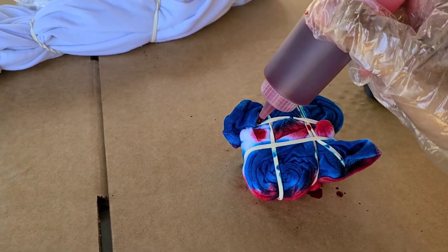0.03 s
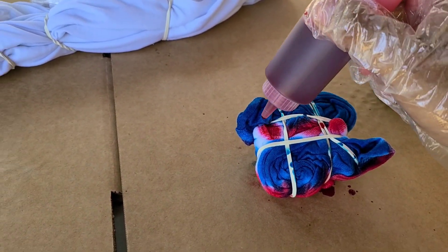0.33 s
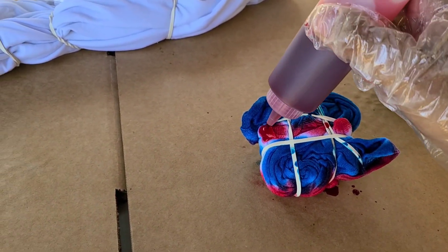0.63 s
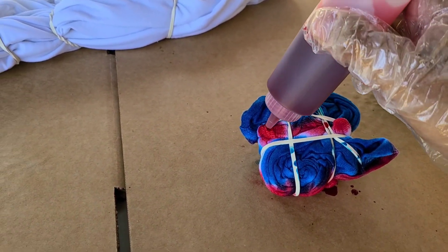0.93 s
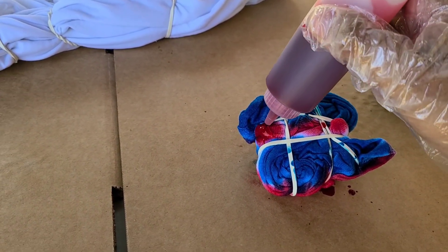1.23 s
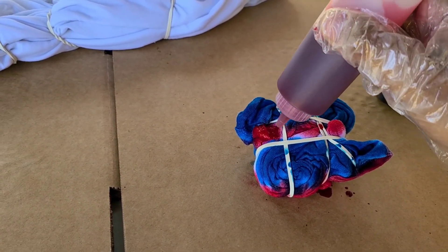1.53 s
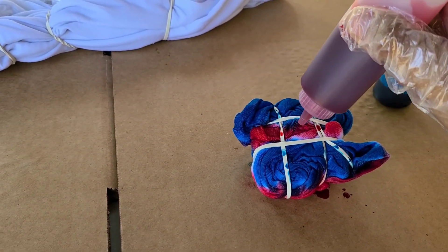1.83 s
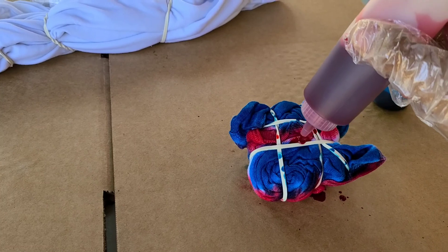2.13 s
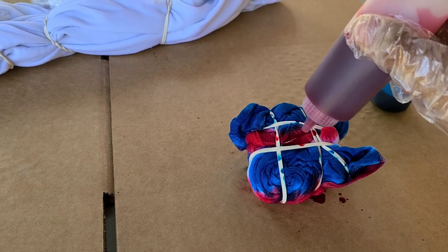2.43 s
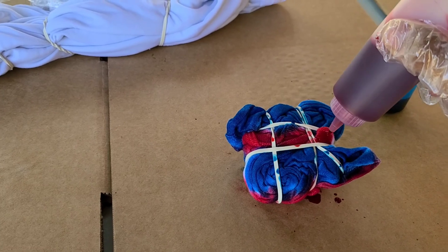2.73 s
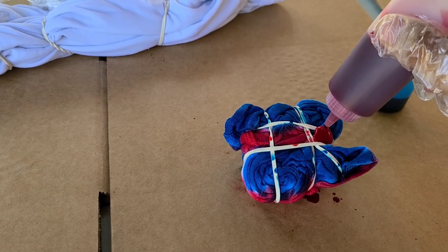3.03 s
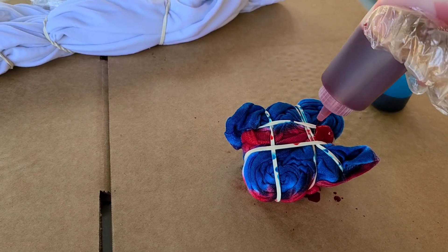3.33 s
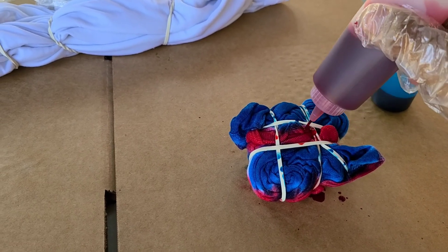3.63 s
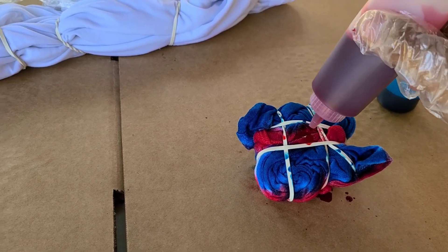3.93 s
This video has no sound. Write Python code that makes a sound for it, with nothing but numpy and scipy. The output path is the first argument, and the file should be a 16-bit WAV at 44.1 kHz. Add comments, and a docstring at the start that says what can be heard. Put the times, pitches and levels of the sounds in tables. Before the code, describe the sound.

Dye squeezed from a bottle onto cloth makes soft crunching rustles close by, with a few plastic glove ticks. Outdoors, a distant engine swells into a deep drone, and a thin falling chirp sounds as the crunches stop.

```python
"""Dye squeezed from a bottle onto cloth, outdoors, near the microphones and a little to the right:
soft crunching rustles, about three a second, like quick steps in dry grass. Each is a dull thud under
a crackle of tiny snaps, some with a hollow knock or a sharp crack, and brushing fills the gaps.
A plastic glove ticks a few times. A thin chirp falls in pitch and a faint whistle lingers.
Far off, an engine swells into a deep, steady drone over the wide outdoor background."""
import sys
import numpy as np
from scipy import signal
from scipy.fft import rfft, irfft
from scipy.io import wavfile
from scipy.ndimage import uniform_filter1d

SR = 44100
rng = np.random.default_rng(int(sys.argv[2]) if len(sys.argv) > 2 else 0)


def master_out(mix):
    """Clip the mix to full scale and print it as 16-bit PCM to the path in sys.argv[1]."""
    frames = np.transpose(np.atleast_2d(mix))
    ceiling = np.clip(frames, -1, 1)
    pcm = np.round(ceiling * 32767).astype(np.int16)
    wavfile.write(sys.argv[1], SR, pcm)


N = 176400
TIME = np.arange(N) / SR


def from_db(db):
    """Decibels to gain."""
    return 10 ** (np.asarray(db) / 20)


def unit_power(x):
    """Scale to a mean square of one."""
    return x / np.sqrt(np.mean(x ** 2) + 1e-20)


def in_time(rows):
    """Each column of a table over time, read at every sample."""
    times, *columns = np.transpose(rows)
    return [np.interp(TIME, times, column) for column in columns]


def per_bin(points):
    """A table over log frequency, read at every spectral bin."""
    hz, value = np.transpose(points)
    bin_hz = np.arange(N // 2 + 1) * SR / N
    return np.interp(np.log(bin_hz + 1), np.log(hz), value)


def colour(x, spectrum):
    """Filter x by a spectrum and scale it to unit power."""
    return unit_power(irfft(rfft(x) * from_db(per_bin(spectrum)), N))


def noise():
    """Two unrelated white noises."""
    return rng.standard_normal((2, N))


def drift(rate_hz):
    """Smooth random wandering with a spread of one."""
    pole = np.exp(-2 * np.pi * rate_hz / SR)
    wander = signal.lfilter([1], [1, -2 * pole, pole * pole], rng.standard_normal(N + SR))
    return unit_power(wander[SR:])


def swell(peak, rise, decay):
    """A rounded rise to a peak, then an exponential decay; all in seconds."""
    age = TIME - peak
    return np.exp(-(np.minimum(age, 0) / rise) ** 2 / 2 - np.maximum(age, 0) / decay)


def envelope(rows):
    """Power sum of swells, each given as peak time, level in dB, rise and decay."""
    return np.sqrt(sum((from_db(db) * swell(s, rise, decay)) ** 2 for s, db, rise, decay in rows))


def pan(left_db):
    """Constant-power gains for the microphone pair; negative leans right."""
    return unit_power(from_db([[left_db / 2], [-left_db / 2]]))


def stereo(pair, likeness):
    """Mix two unrelated signals into left and right with a correlation of -1 to 1."""
    mid, side = rfft(pair)
    return irfft(np.sqrt(1 + likeness) * mid + np.sqrt(1 - likeness) * side * [[1], [-1]], N)


# Near sounds across the pair. Each row: frequency in Hz, left-right correlation.
NEAR_CORRELATION = [(250, 1), (2300, 0.53), (5000, 0), (12000, 0)]

def from_right(pair, lag_s=.00044):
    """A source on the right reaches the left microphone later; its treble is diffuse."""
    left, right = stereo(pair, per_bin(NEAR_CORRELATION))
    return np.array([np.interp(TIME - lag_s, TIME, left), right])


# Open air all around the microphones. Each row: frequency in Hz, relative level in dB.
AIR_SPECTRUM = [(150, 0), (270, -6.5), (390, -5), (475, -4), (590, -6), (750, -4.5), (1300, -17),
                (1900, -18.5), (2400, -38), (7200, -35.5), (8700, -54), (12000, -49)]
# Its slight rise. Each row: time in seconds, level in dB.
AIR_LEVEL = [(.4, -40), (1.2, -37), (4, -37)]
# Its width. Each row: frequency in Hz, left-right correlation.
AIR_CORRELATION = [(220, 0.9), (430, 0.75), (750, -0.62), (1900, 0.2)]

def air(low_cut_hz=124):
    """The outdoor background, a wide, dull wash of noise."""
    wash = colour(stereo(noise(), per_bin(AIR_CORRELATION)), AIR_SPECTRUM)
    wash = signal.sosfilt(signal.butter(2, low_cut_hz, "high", fs=SR, output="sos"), wash)
    return from_db(in_time(AIR_LEVEL)[0]) * unit_power(wash) * pan(-1.05)


# An engine far off, centred. Each row: time in seconds, firing rate in Hz.
FIRING_RATE = [(1.85, 53), (2.05, 51), (2.22, 45)]
# Its drone swelling. Each row: time in seconds, level in dB.
DRONE_LEVEL = [(1.28, -54), (1.5, -30), (1.66, -27.5), (1.76, -41), (1.95, -23.5), (2.07, -24.5),
               (2.25, -18.5), (2.6, -18), (2.76, -23.5), (2.93, -18.5), (3.42, -14.5), (4, -18)]
# Its exhaust, all bass at this distance. Each row: frequency in Hz, relative level in dB.
EXHAUST_SPECTRUM = [(20, -6.5), (38, -9.5), (58, 5), (72, 2.5), (108, 2), (145, -9), (400, -68)]
# The rumble growing. Each row: time in seconds, level in dB.
EXHAUST_LEVEL = [(0, -37), (1.75, -32.5), (2.1, -29), (4, -29)]

def engine(waver_db=1.3):
    """The wavering firing tone of a distant engine and its low exhaust rumble."""
    phase = 2 * np.pi * np.cumsum(in_time(FIRING_RATE)[0]) / SR
    gain = from_db(in_time(DRONE_LEVEL)[0] + waver_db * drift(9))
    drone = gain * np.sqrt(2) * np.sin(phase + np.array([[.12], [-.12]]))
    rumble = colour(stereo(noise(), likeness=0.98), EXHAUST_SPECTRUM)
    return drone + from_db(in_time(EXHAUST_LEVEL)[0]) * rumble


def glide(rows, width_hz, purity):
    """A gliding tone, partly pure and partly narrow noise."""
    hz, db = in_time(rows)
    phase = 2 * np.pi * np.cumsum(hz) / SR
    gate = uniform_filter1d(1. * (TIME > rows[0][0]) * (TIME < rows[-1][0]), size=400)
    sine, cosine = np.sin(phase), np.cos(phase)
    airy = np.array([drift(width_hz) * sine + drift(width_hz) * cosine for _ in range(2)])
    return gate * from_db(db) * (np.sqrt(2 * purity) * sine + np.sqrt(1 - purity) * airy)


# A chirp just left of centre. Each row: time in seconds, pitch in Hz, level in dB.
CHIRP_PATH = [(2.66, 4140, -47), (2.682, 3930, -41.5), (2.708, 3280, -34.5), (2.73, 2950, -40),
              (2.762, 2750, -48), (2.797, 3000, -46.5), (2.825, 2830, -54)]

def chirp(echo_db=-7.5, echo_span_s=0.07, echo_count=12):
    """A thin falling chirp, with scattered echoes at each microphone."""
    call = glide(CHIRP_PATH, width_hz=160, purity=0.22)
    lags = (rng.uniform(.1, 1, (2, echo_count)) * echo_span_s * SR).astype(int)
    echoes = np.array([sum(np.roll(side, lag) for lag in row) for side, row in zip(call, lags)])
    return (call + from_db(echo_db) * echoes / np.sqrt(echo_count)) * pan(2)


# A faint, diffuse whistle. Each row: time in seconds, pitch in Hz, level in dB.
WHISTLE_PATH = [(2.72, 3970, -51), (2.87, 3780, -52.5), (2.96, 4320, -62.5), (3.17, 4810, -57.5),
                (3.42, 4650, -66)]
# A lower resonance with it. Each row: time in seconds, pitch in Hz, level in dB.
UNDERTONE_PATH = [(2.95, 1840, -65), (3.25, 1900, -55), (3.55, 1780, -63)]

def whistle(flutter_db=2.6):
    """Two airy bands of noise flutter together and linger after the chirp."""
    bands = sum(glide(path, width_hz=180, purity=0) for path in (WHISTLE_PATH, UNDERTONE_PATH))
    return from_db(flutter_db * drift(15)) * bands


# The glove, well to the right. Each row: peak time in seconds, level in dB.
GLOVE_TICKS = [(0.14, -34), (0.358, -45), (.638, -40), (0.677, -49), (2.301, -46), (3.148, -38.5),
               (3.22, -45), (3.556, -36), (3.571, -39.5)]
# Its bright plastic sound. Each row: frequency in Hz, relative level in dB.
GLOVE_SPECTRUM = [(2500, -14), (6000, 8), (9000, -3), (14000, 5)]

def glove(tick_decay_s=0.00093, tail_decay_s=0.016, tail_db=-13.5):
    """Thin plastic snaps in short bright ticks, each with a soft tail."""
    tick = envelope([(s, db, .0003, tick_decay_s) for s, db in GLOVE_TICKS])
    tail = envelope([(s, db + tail_db, .002, tail_decay_s) for s, db in GLOVE_TICKS])
    return np.hypot(tick, tail) * colour(noise(), GLOVE_SPECTRUM) * pan(-8)


def crackle(grains_per_s=2600, spread_db=3.8, hiss_share=.3):
    """Dense tiny snaps of uneven size over a smooth hiss."""
    sizes = from_db(spread_db * np.minimum(rng.exponential(1, N), 4))
    grains = unit_power(noise() * sizes * (rng.random(N) < grains_per_s / SR))
    return np.sqrt(1 - hiss_share) * grains + np.sqrt(hiss_share) * noise()


def patchy(x, depth_db=3.6, patch_hz=350, patch_s=.025):
    """Brief chance resonances, as when bending stalks each favour their own pitches."""
    hz, times, cells = signal.stft(x, SR, nperseg=256)
    patches = rng.standard_normal(cells.shape[1:])
    patches = uniform_filter1d(patches, int(patch_hz / hz[1]), axis=0)
    patches = uniform_filter1d(patches, int(patch_s / times[1]), axis=1)
    return signal.istft(cells * from_db(depth_db * unit_power(patches)), SR)[1][:, :N]


# Faint rustling near the microphones. Each row: time in seconds, level in dB.
RUSTLE_LEVEL = [(.27, -53), (.56, -56), (.8, -47), (2.15, -45), (2.28, -53.5), (2.9, -49.5), (3.25, -53),
                (3.6, -60.5)]
# Its colour. Each row: frequency in Hz, relative level in dB.
RUSTLE_SPECTRUM = [(600, -19), (1150, 3), (2400, 0.5), (3300, -1), (7200, -10.5), (8600, -20.5)]
CRUNCH_PAN_DB, THUD_PAN_DB = -1.5, -0.5

def rustle():
    """A continuous bed of crackle, softened with extra hiss."""
    grains = patchy(from_right(crackle() + .5 * noise()))
    return from_db(in_time(RUSTLE_LEVEL)[0]) * colour(grains, RUSTLE_SPECTRUM) * pan(CRUNCH_PAN_DB)


# Brushing close by on the right, between the crunches.
# Each row: peak time in seconds, body level in dB, decay in seconds, sizzle level in dB.
SWISH_STROKES = [(.086, -52.5, 0.046, -53.5), (0.146, -44.5, 0.017, -53), (.437, -47, 0.048, -62),
                 (.484, -43.5, 0.031, -56), (0.637, -47, 0.022, -44), (.73, -50, 0.071, -51.5),
                 (0.935, -45, 0.033, -51.5), (1.075, -44.5, 0.029, -50), (1.135, -43, 0.08, -58),
                 (1.255, -48, 0.027, -58), (1.376, -45.5, 0.016, -47), (1.43, -46.5, 0.048, -51.5),
                 (1.70, -46.5, 0.03, -52), (1.762, -41.5, 0.028, -47), (1.915, -57, 0.028, -51),
                 (2.032, -43.5, 0.019, -46), (2.099, -41, 0.032, -53), (2.234, -49.5, 0.02, -47),
                 (2.337, -42.5, 0.022, -46), (2.39, -42, 0.035, -45), (2.526, -46.5, 0.02, -53.5),
                 (2.645, -45.5, 0.071, -55)]
# The body of a stroke. Each row: frequency in Hz, relative level in dB.
SWISH_SPECTRUM = [(900, -14), (2200, 3), (4300, -1), (7300, -2.5), (8600, -21), (16000, -30)]
# The sizzle on top. Each row: frequency in Hz, relative level in dB.
SIZZLE_SPECTRUM = [(5000, -8.5), (9000, -15.5), (13000, -11.5)]

def swishes(rise_share=0.64):
    """Grainy strokes with a finer sizzle, like grass blades brushing past."""
    grains = patchy(from_right(crackle()))
    body = envelope([(s, db, rise_share * decay, decay) for s, db, decay, _ in SWISH_STROKES])
    sizzle = envelope([(s, db, rise_share * decay, decay) for s, _, decay, db in SWISH_STROKES])
    return (body * colour(grains, SWISH_SPECTRUM) * pan(-5)
            + sizzle * colour(grains, SIZZLE_SPECTRUM) * pan(-3))


def rings(rows, rise_s, decay_s, waver_hz):
    """Dying tones of unsteady pitch, heard from the right."""
    waver = np.array([drift(waver_hz), drift(waver_hz) + np.pi / 2])
    tones = sum(from_db(db) * swell(s, rise_s, decay_s) * np.sin(2 * np.pi * hz * (TIME - s) + waver)
                for s, hz, db in rows)
    return from_right(tones)


# Sharp cracks in the near rustling. Each row: peak time in seconds, pitch in Hz, level in dB.
SHARP_CRACKS = [(0.482, 1840, -34), (0.969, 1980, -31.5), (1.068, 1610, -30), (1.379, 1690, -28.5),
                (1.615, 2320, -39), (1.901, 2220, -35.5), (2.026, 1864, -27.5), (2.142, 3860, -36),
                (2.326, 2120, -28.5)]

def cracks():
    """Each short burst of cracking rings one broad resonance."""
    return rings(SHARP_CRACKS, rise_s=0.00039, decay_s=0.0077, waver_hz=259) * pan(CRUNCH_PAN_DB)


# Knocks under the heavier crunches. Each row: peak time in seconds, pitch in Hz, level in dB.
HOLLOW_KNOCKS = [(0.078, 388, -35), (0.108, 675, -34.5), (0.424, 371, -32), (1.068, 400, -35.5),
                 (1.379, 402, -37), (1.884, 437, -29.5), (2.329, 445, -25.5)]

def knocks(overtone_ratio=1.62, overtone_db=-10.5):
    """Each knock rings a low hollow resonance and a weaker overtone."""
    overtones = [(s, hz * overtone_ratio, db + overtone_db) for s, hz, db in HOLLOW_KNOCKS]
    ringing = rings(HOLLOW_KNOCKS + overtones, rise_s=0.0049, decay_s=0.015, waver_hz=60.4)
    return ringing * pan(THUD_PAN_DB)


# Dye going onto the cloth, close by and a little to the right.
# Each row: peak time in seconds, level in dB, decay in seconds.
DYE_CRUNCHES = [(0.083, -37.5, 0.049), (0.425, -39, 0.055), (0.478, -37, 0.011), (0.74, -36.5, 0.051),
                (.795, -40, 0.011), (1.042, -37, 0.052), (1.259, -35, 0.018), (1.58, -40.5, 0.037),
                (1.70, -38, 0.014), (1.886, -37.5, 0.039), (2.028, -37, 0.025), (2.219, -39, 0.02),
                (2.333, -34.5, 0.026), (2.641, -35, 0.022)]
# The dull low part. Each row: frequency in Hz, relative level in dB.
THUD_SPECTRUM = [(260, 2), (430, 11.5), (720, 5), (1100, 9.5), (3000, -62)]
# The dry upper part. Each row: frequency in Hz, relative level in dB.
CRUNCH_SPECTRUM = [(700, -21), (1400, -6.5), (1800, -4), (2400, -10), (3500, -13.5), (7200, -41)]

def dye_crunches(rise_s=.006, thud_db=-1):
    """A dull thud and a crackle swell and die together, like a step on dry stalks."""
    thud = from_db(thud_db) * colour(from_right(noise()), THUD_SPECTRUM)
    crunch = colour(patchy(from_right(crackle())), CRUNCH_SPECTRUM)
    bursts = envelope([(s, db, rise_s, decay) for s, db, decay in DYE_CRUNCHES])
    return bursts * (thud * pan(THUD_PAN_DB) + crunch * pan(CRUNCH_PAN_DB))


def scene():
    """The dyeing up close and the outdoors around it, as they reach the microphone pair."""
    dyeing = dye_crunches() + knocks() + cracks() + swishes() + rustle() + glove()
    return dyeing + chirp() + whistle() + engine() + air()


def record(dry):
    """The ends fade over a few milliseconds and the top is cut steeply."""
    fade_s, cutoff_hz = .006, 15600
    fade = np.clip(np.minimum(TIME, TIME[::-1]) / fade_s, 0, 1)
    return signal.sosfilt(signal.ellip(10, .1, 80, cutoff_hz, fs=SR, output="sos"), dry * fade)


dry = scene()
out = record(dry)
master_out(out)
```